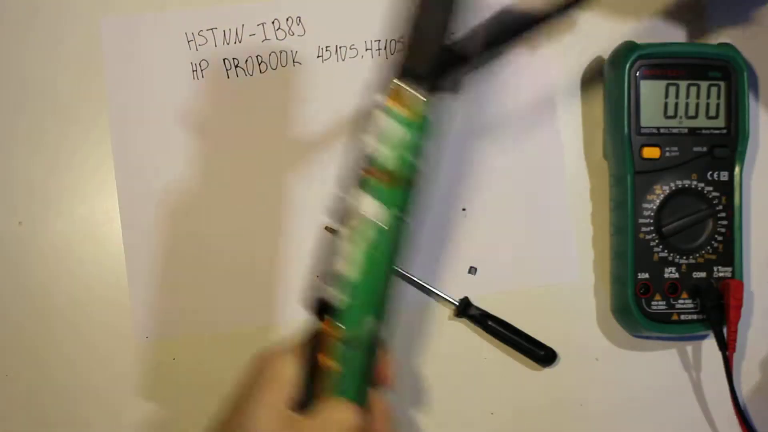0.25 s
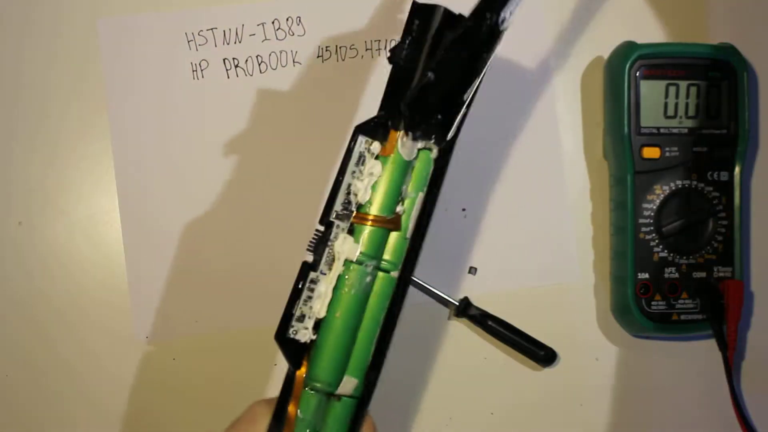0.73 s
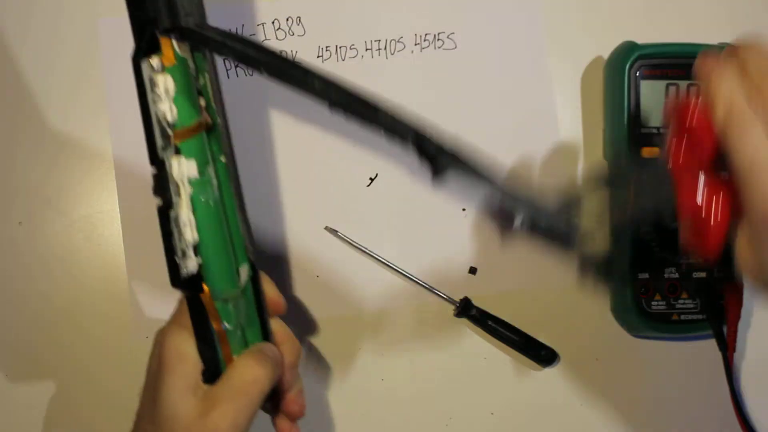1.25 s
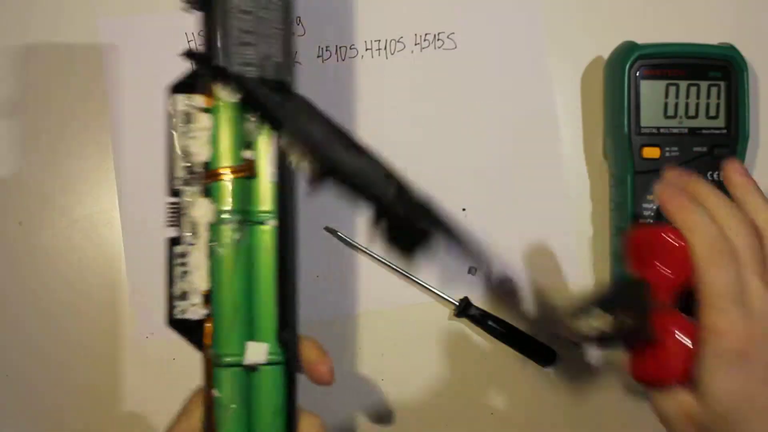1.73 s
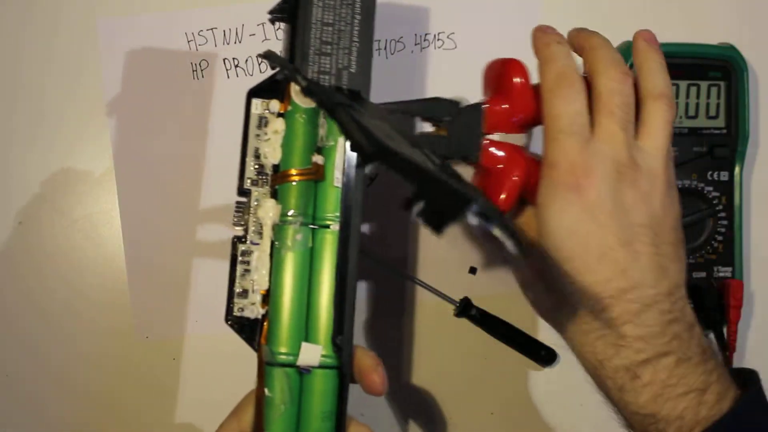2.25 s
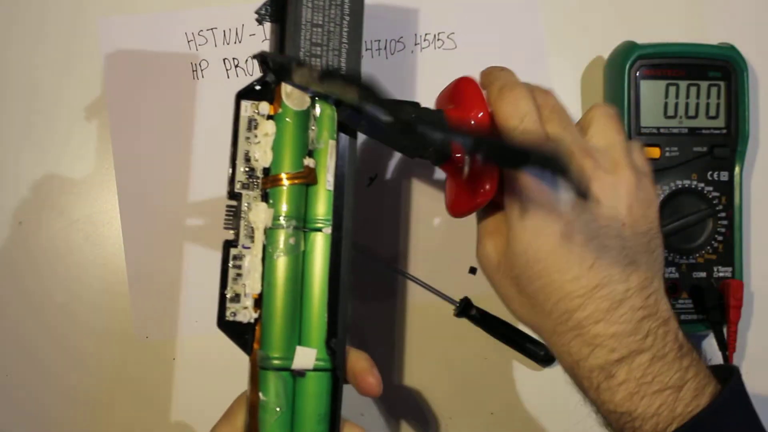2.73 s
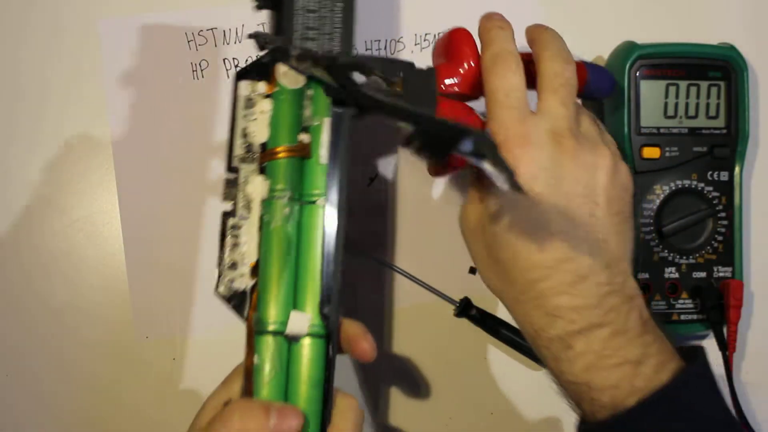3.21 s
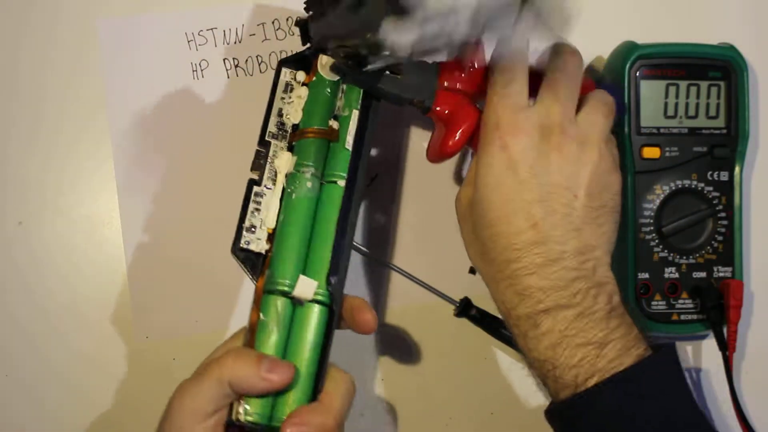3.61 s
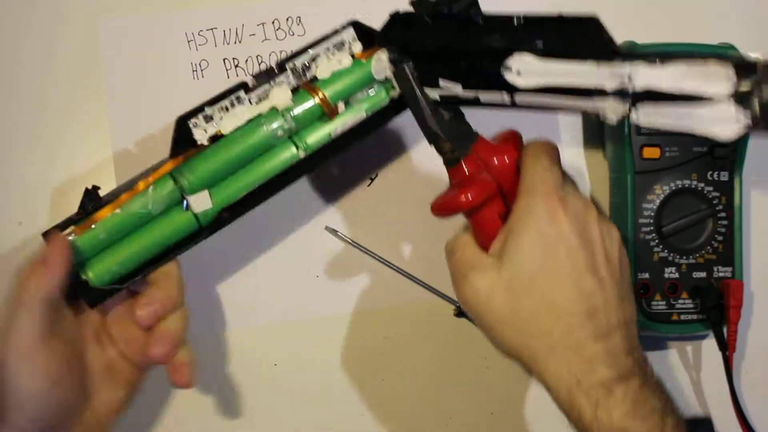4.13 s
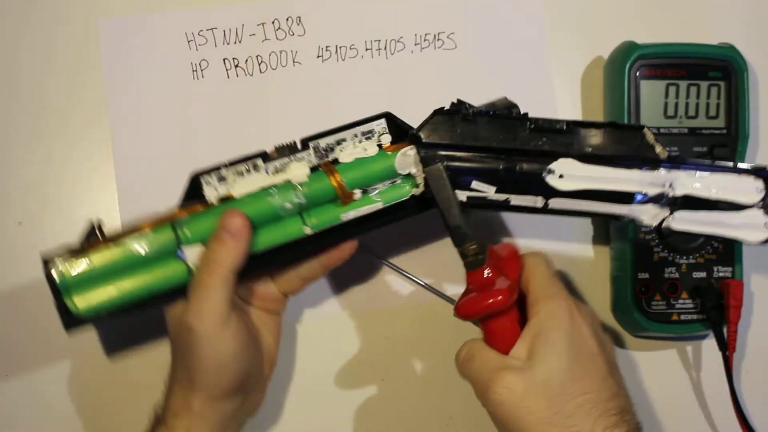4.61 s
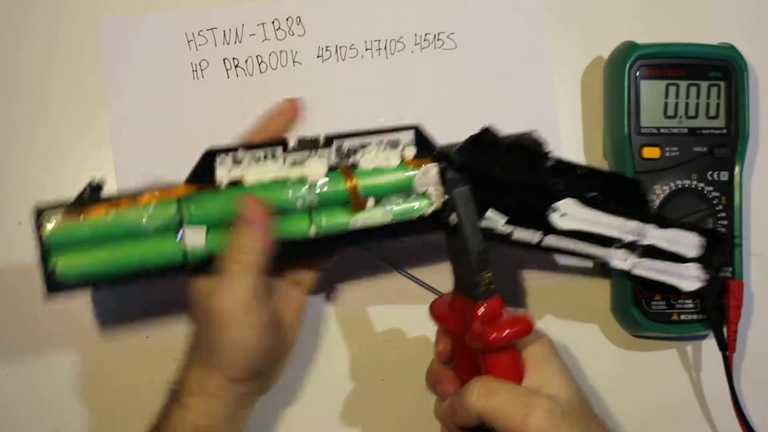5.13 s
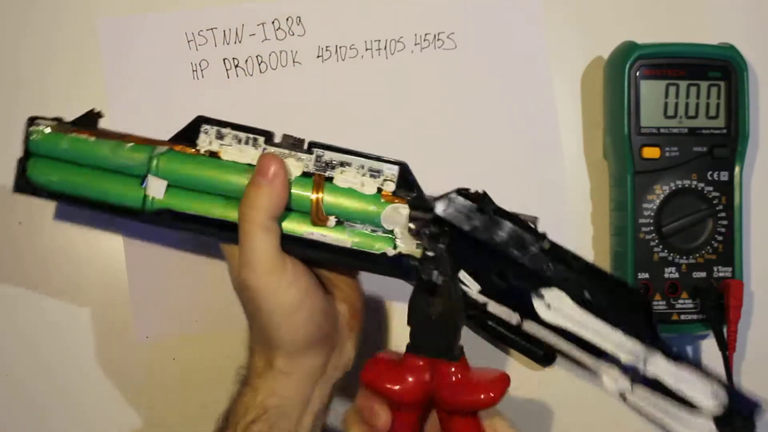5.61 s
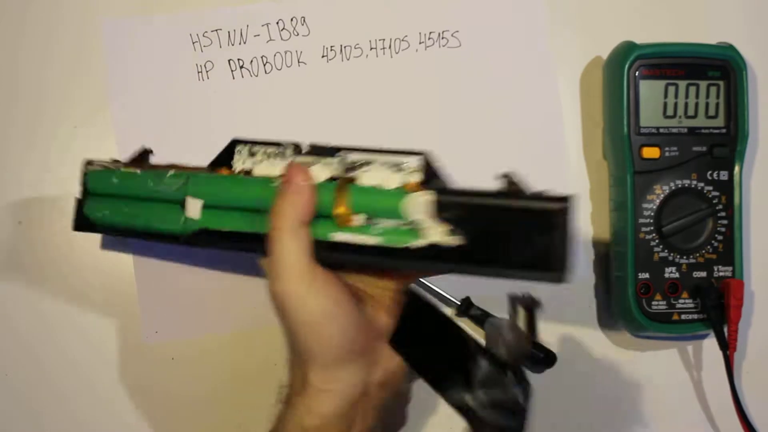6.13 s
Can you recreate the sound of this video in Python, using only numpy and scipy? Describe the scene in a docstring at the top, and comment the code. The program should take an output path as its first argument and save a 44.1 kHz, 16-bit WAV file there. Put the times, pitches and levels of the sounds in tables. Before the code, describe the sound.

Close, dry plastic cracks, snapping clips and tool knocks come in irregular bursts, crowding together before a final hollow break in a small room.

```python
"""A plastic battery case is twisted and pried apart with pliers, heard close by in a small room.
From the start welds crack, latch hooks snap and ring, and the shell ticks and scrapes in between.
Later the jaws also knock on the case: each blow, like each crack, drives a bank of damped modes.
Near the end the cracks crowd together and the lid tears off with a hollow boom, its own modes ringing.
Throughout, filtered noise makes the room answer and the hiss; loud peaks clip and gain control ducks."""
import sys
import numpy as np
from scipy import signal
from scipy.fft import rfft, irfft
from scipy.io import wavfile
from scipy.ndimage import uniform_filter1d

SR = 44100
rng = np.random.default_rng(int(sys.argv[2]) if len(sys.argv) > 2 else 0)


def transcribe(u):
    """Save the signal u as a 16-bit wav file named by the first command-line argument.

    u: samples, shape (n,) or (channels, n), limited to [-1, 1]; the rate is SR.
    q: integer samples, one column per channel.
    """
    v = np.clip(np.atleast_2d(u).T, -1, 1)
    q = np.round(v * 32767).astype(np.int16)
    wavfile.write(sys.argv[1], SR, q)


N = 280476
T = np.arange(N) / SR

# steady hiss spectrum: (frequency [Hz], relative density [dB])
HISS_SPECTRUM = [(25, -17), (60, -14.5), (100, -10.5), (150, -0.5), (300, -2), (600, -6.5), (1200, -10.5),
                 (2500, -17), (7000, -22.5), (15000, -26)]
# hiss level: (time [s], rms level [dB])
HISS_LEVEL = [(.25, -59), (.7, -52), (3.1, -53), (5.4, -54), (6.36, -61)]
TONE_HZ, TONE_DB = 7800, -73.5
# room answer: (frequency [Hz], t60 [s], strength [dB])
ROOM = [(198.5, 0.43, -11.5), (680, 0.41, -12), (1500, 0.47, -11.5), (3090, 0.37, -6.5), (6760, 0.3, -11),
        (11300, 0.27, -12.5), (16000, 0.13, -12)]

# dull low thumps under some of the loudest blows: (time [s], level [dB])
THUMPS = [(2.3013, -30), (3.798, -21.5), (5.678, -17), (5.898, -21)]
# plastic sliding on plastic and steel:
# (time of greatest force [s], length [s], level [dB], treble boost [dB], creak [Hz])
SCRAPES = [(0.017, 0.087, -29.5, 3, 2830), (0.218, 0.09, -49.5, -4, 1790), (.625, 0.074, -45, -10, 2330),
           (1.256, .11, -35.5, 3, 2900), (2.743, 0.034, -43, -27, 1500), (3.249, 0.17, -42, -21, 776),
           (4.017, 0.038, -34, -6, 2160), (4.3, 0.17, -35.5, 9, 2070), (4.301, 0.033, -28.5, -3, 840),
           (4.579, 0.11, -45.5, 4, 950), (4.745, 0.048, -49, 19, 3160), (5.138, .11, -37.5, 10, 1850),
           (5.432, 0.11, -52, -3, 3890), (5.922, 0.039, -14, 24, 3650)]
# sliding friction spectrum: (frequency [Hz], level [dB])
FRICTION = [(200, -14), (600, -10.5), (850, 9), (1500, 1), (2200, 1), (5700, -0.5), (16000, -7.5)]
RISE_SHARE = 0.43  # part of a stroke's length in which force builds up

# case modes in an ordinary grip: (frequency [Hz], level [dB], t60 [s])
CASE_MODES = [(493, -12, 0.027), (598, 0, 0.016), (772, 7, 0.019), (926, -0.5, 0.041), (1128, 0.5, 0.028),
              (1340, -2, 0.018), (1708, -14.5, 0.048), (2130, -7.5, 0.03), (2700, 4, 0.0041),
              (3213, 2, 0.017), (3750, -1.5, 0.013), (4390, -4, 0.016), (5050, -1, 0.01), (5530, 0, 0.0096),
              (6240, 4.5, 0.0055), (6970, 3.5, 0.0069), (8520, 2.5, 0.0042), (9140, -1.5, 0.0048),
              (10430, 5.5, 0.0049), (12770, 13.5, 0.0018), (13900, 0, 0.0069), (15990, 7.5, 0.0064)]
CASE_HZ = 917  # nominal case pitch in an ordinary grip
# bands of body, walls, ribs, broken edges: (low [Hz], high [Hz])
PARTS = [(410, 1500), (1500, 4000), (4000, 8000), (8000, 16000)]
# crack energy split at brightness 0: (body [dB], walls [dB], ribs [dB], broken edges [dB])
CRACK_SHAPE_DB = (0.78, -1.7, -2.4, 0.68)
# knock energy split: (body [dB], walls [dB], ribs [dB], broken edges [dB])
KNOCK_SHAPE_DB = (-0.5, -9, -15, -23)

# shell under strain: (start [s], end [s], energy of the weakest ticks [dB])
STRAINED = [(0.055, .27, -41.5), (0.499, 0.984, -44), (1.251, 1.51, -41), (3.942, 4.122, -42),
            (5, 5.87, -35.5), (6.152, 6.271, -43)]
TICK_BRIGHTNESS_DB_PER_OCT = 2.55
# pliers knocking on the case: (time [s], energy [dB], gripped case pitch [Hz])
KNOCKS = [(1.698, -32, 796), (2.3012, -1, 859), (2.497, -19, 1054), (2.6456, -32, 980), (2.752, -31, 1060),
          (2.8173, -23.5, 942), (3.1644, -8.5, 798), (3.5985, -24, 953), (4.731, -28, 824),
          (4.7642, -27.5, 950), (4.883, -31.5, 855), (4.9787, -31.5, 944), (5.1995, -10.5, 877)]
# latch hooks springing free: (time [s], snap energy [dB], hook pitch [Hz])
LATCHES = [(.099, -27.5, 5460), (1.22, -12.5, 5300), (1.229, -17, 3720), (1.3033, -24, 3280),
           (1.427, -31.5, 3224), (1.496, -39, 5500), (2.171, -32, 1740), (4.021, -25, 2300),
           (4.7195, -20.5, 3040), (5.217, -10.5, 6120), (5.5228, -8, 6600), (5.558, -8, 6350),
           (5.7824, -25.5, 7300)]
# pitch whose snap has brightness 0; brightness [dB per octave] gained per octave above it
HOOK_PLAIN_HZ, HOOK_BRIGHTENING = 2155, 5.5
HOOK_Q, HOOK_DB = 5, 2  # ring energy relative to the snap
# lid springing free: (time [s], level [dB])
RELEASE = (5.954, -3.5)
# lid modes before a common pitch factor: (frequency [Hz], level [dB], t60 [s])
LID_MODES = [(226, -18, 0.17), (279, 6.5, 0.076), (295, 0, 0.12), (457, -20.5, 0.064), (523, -10, 0.058),
             (667, -5.5, 0.13), (726, -4, 0.036), (1074, -9.5, 0.11), (1750, -10, 0.079), (2010, 1, 0.023)]
# welds cracking: (time [s], energy [dB], brightness [dB per octave])
CRACKS = [(.004, -10.5, 1.5), (.332, -17, 3), (.3462, -23, 5.5), (0.3677, -15, 4.5), (1.124, -21.5, 10),
          (1.186, -22, -1.5), (1.203, -9.5, 4.5), (1.26, -25, 12), (1.672, -18.5, 9), (1.6977, -14, 7),
          (2.532, -28, -1.5), (2.7877, -33.5, 5), (3.2845, -8, 5), (3.6078, -11.5, 10.5),
          (3.774, -19, -0.5), (3.7871, -8, 5.5), (3.7985, -6.5, 3), (3.9255, -5.5, 5), (4.542, -12.5, 7.5),
          (4.563, -11, 0.5), (4.5783, -23, 8), (4.6156, -20, 14), (4.669, -8.5, 5.5), (4.8064, -27, -.5),
          (4.8389, -4.5, 6.5), (5.015, -20.5, 7.5), (5.0366, -20.5, 3.5), (5.0568, -22, 1),
          (5.274, -19.5, 7), (5.333, -18, 17), (5.4219, -24, 22), (5.478, -6.5, 8), (5.6014, -3.5, 7.5),
          (5.677, -2, 8.5), (5.7058, -15.5, 7), (5.8207, -6, 8), (5.888, -17, 5), (5.8937, -4, 3),
          (5.8988, 2.5, 2.5), (5.9546, 4, -1.5)]

# gain control: threshold, share of the excess removed, reaction time, recovery rate
LIMIT_DB, LIMIT_SHARE, LIMIT_S, RECOVER_DB_PER_S = -15.5, 0.66, 0.018, 38
CUT_HZ = 16150

PART_FILTERS = [signal.butter(4, band, "bandpass", fs=SR, output="sos") for band in PARTS]


def amp(db):
    """Decibels to gain."""
    return 10 ** (np.asarray(db) / 20)


def unit(x):
    """Scales to an rms of 1."""
    return x / np.sqrt(np.mean(x ** 2) + 1e-20)


def unit_energy(x):
    """Scales to the energy of 1 ms at full scale."""
    return unit(x) / np.sqrt(1000 * len(x) / SR)


def read(points, hz):
    """Table columns interpolated linearly over log frequency."""
    f, *columns = np.transpose(points)
    return np.array([np.interp(np.log(hz + 1), np.log(f), column) for column in columns])


def add(mix, start_s, sound):
    """Lays a sound into the mix, cut at the end."""
    part = mix[..., max(0, round(start_s * SR)):][..., :sound.shape[-1]]
    part += sound[..., :part.shape[-1]]


def colour(x, points):
    """Filters a signal by a spectrum table."""
    hz = np.fft.rfftfreq(len(x), 1 / SR)
    gain = amp(read(points, hz)[0])
    return irfft(rfft(x) * gain, len(x))


def background():
    """Low room noise, hiss and a very faint thin high tone, wavering in level."""
    level_db = np.interp(T, *np.transpose(HISS_LEVEL))
    hiss = amp(level_db) * unit(colour(rng.standard_normal(N), HISS_SPECTRUM))
    waver = unit(uniform_filter1d(rng.standard_normal(N), size=300))
    return hiss + amp(TONE_DB) * waver * np.sin(2 * np.pi * TONE_HZ * T)


def room(x, delay_s=0.00047):
    """Dense reflections from bench and walls: noise with a decay per frequency, top treble dying first."""
    t = T[:SR * 2 // 3]
    onset = np.clip((t - delay_s / 2) / delay_s, 0, 1)
    taps = rng.standard_normal(len(t)) * onset
    hz, when_s, bins = signal.stft(taps, SR, nperseg=128)
    t60_s, db = read(ROOM, hz)[:, :, None]
    # strength is independent of decay time
    decay = amp(db - 60 * when_s / t60_s) * np.sqrt(2 * np.log(1000) / (t60_s * SR))
    response = signal.istft(bins * decay, SR)[1]
    return signal.fftconvolve(x, response)[:N]


def thumps(decay_s=0.00031):
    """Dull low thumps under some of the loudest blows, as overloaded peaks give: one-sided decaying pulses."""
    out = np.zeros(N)
    for start_s, db in THUMPS:
        add(out, start_s, amp(db) * np.exp(-T[:SR // 50] / decay_s))
    return out


def scrapes(catches_per_s=1100, split_hz=3500, grit_db=-0.5, flutter_db=1.0, creak_q=6):
    """Random stick-slip catches swell with the uneven force of each stroke and make one part creak."""
    out, t = np.zeros(N), T[:SR // 2] - 1 / 4
    treble = signal.butter(1, split_hz, "highpass", fs=SR)
    for peak_s, length_s, db, treble_db, creak_hz in SCRAPES:
        sizes = amp(grit_db * np.minimum(rng.exponential(1, len(t)), 4))
        sizes *= rng.choice([-1, 1], len(t))
        catches = sizes * (rng.random(len(t)) < catches_per_s / SR)
        rub = colour(catches, FRICTION)
        rub = unit(rub + (amp(treble_db) - 1) * signal.lfilter(*treble, rub))
        creak = unit(signal.lfilter(*signal.iirpeak(creak_hz, creak_q, fs=SR), rub))

        rise_s, fall_s = length_s * RISE_SHARE, length_s * (1 - RISE_SHARE)
        swell = np.exp(-abs(t / np.where(t < 0, rise_s, fall_s)) ** 1.63)
        flutter = amp(flutter_db * unit(uniform_filter1d(rng.standard_normal(len(t)), size=250)))
        stroke = amp(db) * flutter * swell * unit(rub + creak / 2)
        add(out, peak_s + t[0], stroke[peak_s + t >= 0])  # drop what precedes time 0
    return out


def ring(modes, t, stretch, vary_db):
    """Damped modes, each excited more or less according to where the blow lands."""
    hz, db, t60_s = np.transpose(modes)[:, :, None]
    sign = (-1) ** np.arange(len(hz))[:, None]  # neighbouring modes swing in opposite senses
    strength = sign * amp(db + vary_db * rng.standard_normal(hz.shape))
    return (strength * amp(-60 * t / t60_s) * np.sin(2 * np.pi * hz * stretch * t)).sum(0)


def spread(db, shape_db, brightness=0):
    """Splits a blow's energy among the case parts; brightness [dB per octave] favours the small ones."""
    levels_db = np.array(shape_db) + brightness * np.log2(PARTS).mean(1)
    return db + levels_db - 20 * np.log10(np.linalg.norm(amp(levels_db)))


def share(sound, levels_db):
    """Gives each part's band its energy (dB re 1 ms at full scale)."""
    bands = [signal.sosfilt(sos, sound) for sos in PART_FILTERS]
    return sum(amp(db) * unit_energy(band) for db, band in zip(levels_db, bands))


def slips(length_s, first):
    """Force of one sudden let-go, then a dying shower of tiny fractures."""
    t = T[:SR // 20]
    force = rng.standard_normal(len(t)) ** 3 * np.exp(-t / length_s)
    force /= np.linalg.norm(force)
    force[0] = first
    return force


def strike(force, levels_db, stretch, vary_db, even=1):
    """A force rings the case. Rows: sound towards the microphone, sound into the room."""
    t = T[:len(force)]
    rung = signal.fftconvolve(force, ring(CASE_MODES, t, stretch, vary_db))[:len(t)]
    near = share(rung, levels_db)
    # summed over all directions, radiation peaks and notches even out
    all_round = share(signal.unit_impulse(len(t)), levels_db)
    even = np.clip(even, 0, 1)
    into_room = np.sqrt(even) * all_round + np.sqrt(1 - even) * np.roll(near, SR // 500)
    return np.array([near, into_room])


def ticks(per_s=28, spread_db=4):
    """Tiny fractures of the strained shell ring the case faintly at random times."""
    out = np.zeros((2, N))
    for start_s, end_s, db in STRAINED:
        span_s = end_s - start_s
        for when, size in rng.random((round(per_s * span_s), 2)):
            tick_db = db - spread_db * np.log(max(size, .05))
            levels_db = spread(tick_db, CRACK_SHAPE_DB, TICK_BRIGHTNESS_DB_PER_OCT)
            force = slips(0.00072, first=0.66)
            add(out, start_s + when * span_s, strike(force, levels_db, 0.96, vary_db=9))
    return out


def knocks():
    """The jaws slip and hit the case, a blow dominated by its first impulse; the grip shifts its pitch."""
    out = np.zeros((2, N))
    for start_s, db, hz in KNOCKS:
        blow = slips(length_s=.001, first=3)
        levels_db = spread(db, KNOCK_SHAPE_DB)
        add(out, start_s, strike(blow, levels_db, hz / CASE_HZ, vary_db=3.0, even=0.7))
    return out


def latches(give_s=0.00082):
    """A hook snaps off its ledge and rings; the smaller it is, the higher its pitch and brighter its snap."""
    out = np.zeros((2, N))
    for start_s, db, hz in LATCHES:
        force = slips(give_s, first=0.54)
        brightness = HOOK_BRIGHTENING * np.log2(hz / HOOK_PLAIN_HZ)
        levels_db = spread(db, CRACK_SHAPE_DB, brightness)
        snap = strike(force, levels_db, 0.93, vary_db=0, even=0.39)
        hook = unit_energy(signal.lfilter(*signal.iirpeak(hz, HOOK_Q, fs=SR), force))
        add(out, start_s, snap + amp(db + HOOK_DB) * hook)
    return out


def lid(low_hz=170, rattle_db=-7, rattle_s=0.054, rattle_hz=700):
    """The long hollow lid rings and rattles as it springs free, with no deep bass."""
    start_s, db = RELEASE
    out, t = np.zeros(N), T[:SR // 2]
    lowpass = signal.butter(2, rattle_hz, fs=SR)
    rattle = unit(signal.lfilter(*lowpass, rng.standard_normal(len(t)))) * np.exp(-t / rattle_s)
    boom = ring(LID_MODES, t, stretch=0.98, vary_db=0)
    add(out, start_s, amp(db) * (boom + amp(rattle_db) * rattle))
    return signal.sosfilt(signal.butter(3, low_hz, "highpass", fs=SR, output="sos"), out)


def cracks(quickest_s=0.00052, slowest_s=0.0029, detune=0.11, dull=-0.59, bright=3.5):
    """Clips and welds snap; the slower the plastic gives way, the duller the crack."""
    out = np.zeros((2, N))
    for start_s, db, brightness in CRACKS:
        length_s = np.interp(brightness, [dull, bright], [slowest_s, quickest_s])
        stretch = np.exp(detune * rng.uniform(-1.126, 1))
        force = slips(length_s, first=0.61)
        levels_db = spread(db, CRACK_SHAPE_DB, brightness)
        add(out, start_s, strike(force, levels_db, stretch, vary_db=4, even=0.76))
    return out


def scene(crack_room_db=3, knock_room_db=1, scrape_room_db=-3, lid_room_db=0):
    """Sums the sources, the room's answer and the background."""
    snap, snap_out = cracks() + latches() + ticks()
    knock, knock_out = knocks()
    rub, boom = scrapes(), lid()
    answer = room(amp(crack_room_db) * snap_out + amp(knock_room_db) * knock_out
                  + amp(scrape_room_db) * rub + amp(lid_room_db) * boom)
    return (snap + knock + rub + boom + thumps() + answer + background())[None]


def record(dry):
    """Gain control ducks what follows a loud snap, too late to stop its peak clipping; then the band limit."""
    power = abs(uniform_filter1d(dry[0] ** 2, size=88))  # 2 ms mean
    level_db = 10 * np.log10(power + 1e-12)
    excess_db = LIMIT_SHARE * np.maximum(level_db - LIMIT_DB, 0)
    # hold the largest duck, released at a constant rate
    recovery_db = RECOVER_DB_PER_S * T
    duck_db = np.maximum.accumulate(excess_db + recovery_db) - recovery_db
    lag = np.exp(-1 / (LIMIT_S * SR))
    gain = amp(-signal.lfilter([1 - lag], [1, -lag], duck_db))
    clipped = np.clip(dry * gain, -1, 1)
    lowpass = signal.firwin(255, CUT_HZ, window=("kaiser", 7), fs=SR)
    return signal.oaconvolve(clipped, lowpass[None], "same")


dry = scene()
out = record(dry)
transcribe(out)
```